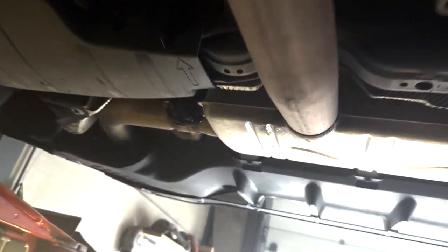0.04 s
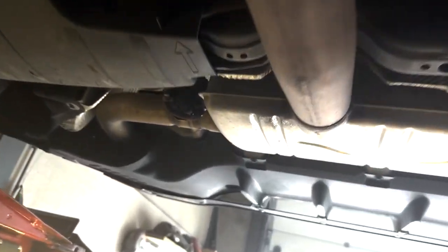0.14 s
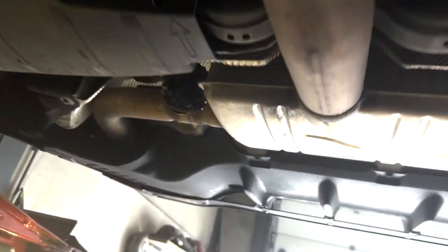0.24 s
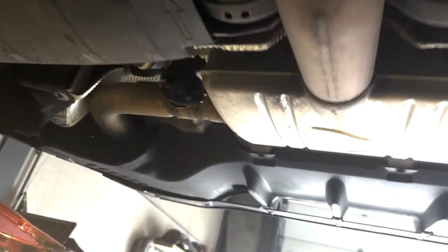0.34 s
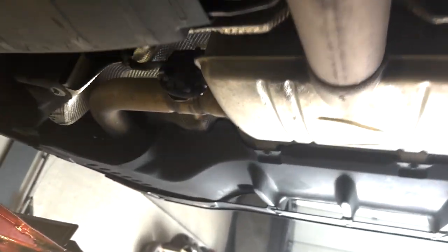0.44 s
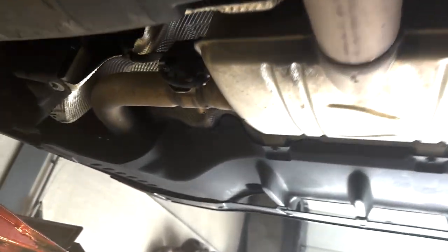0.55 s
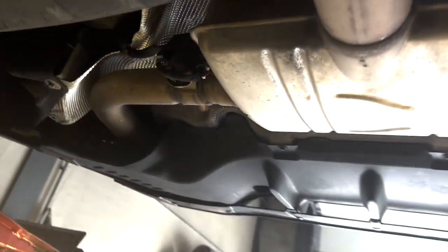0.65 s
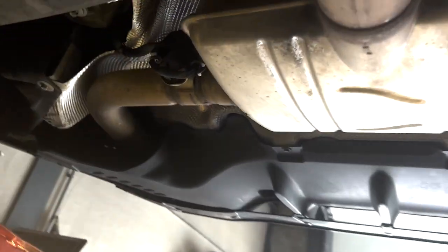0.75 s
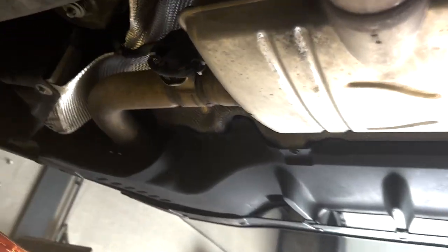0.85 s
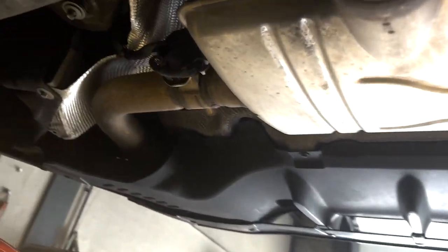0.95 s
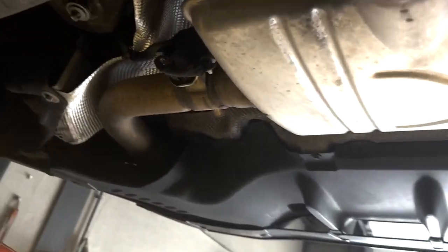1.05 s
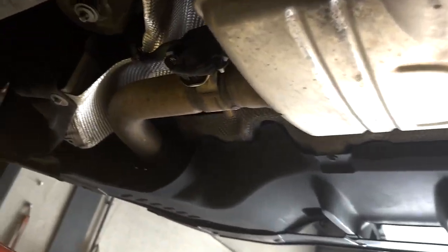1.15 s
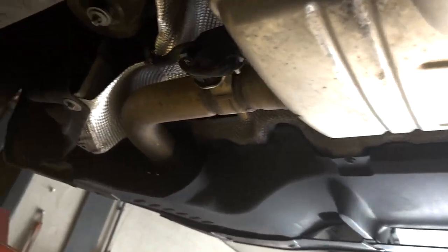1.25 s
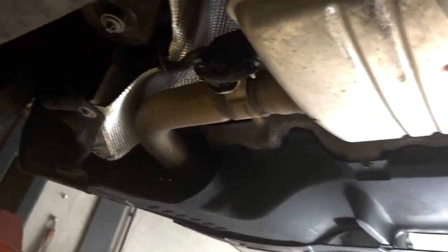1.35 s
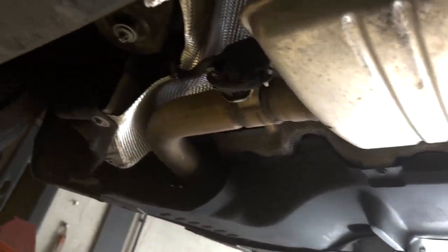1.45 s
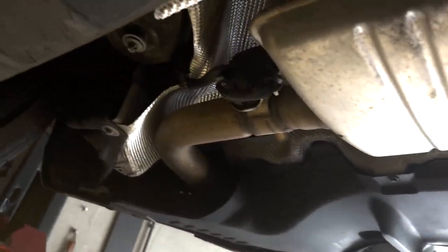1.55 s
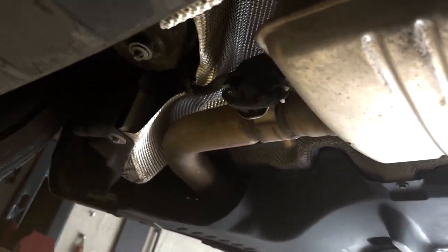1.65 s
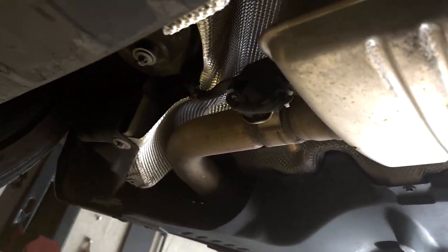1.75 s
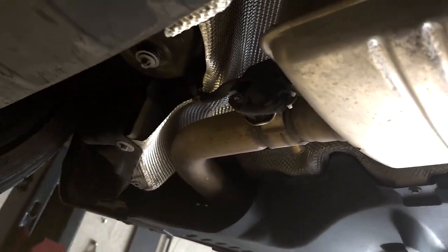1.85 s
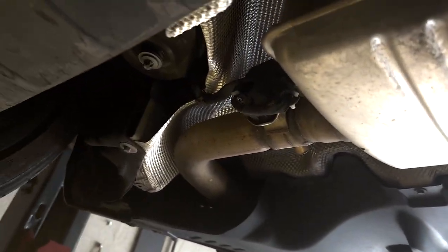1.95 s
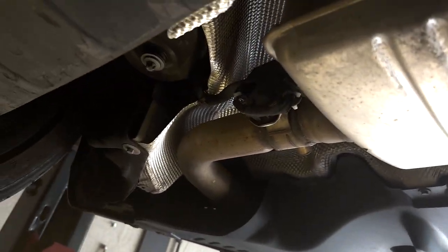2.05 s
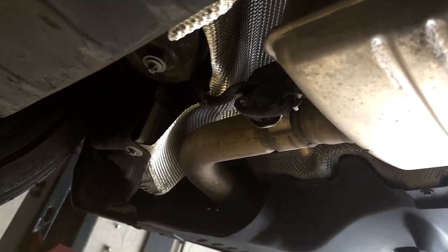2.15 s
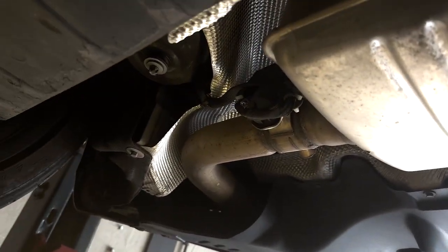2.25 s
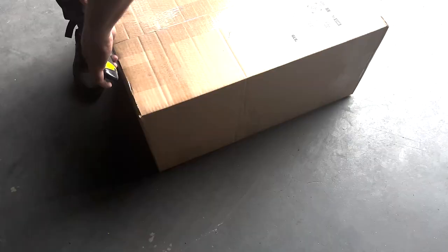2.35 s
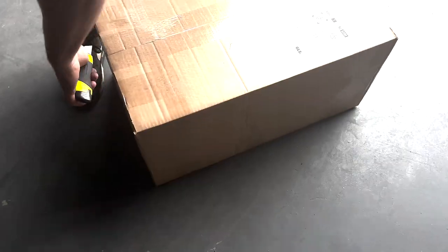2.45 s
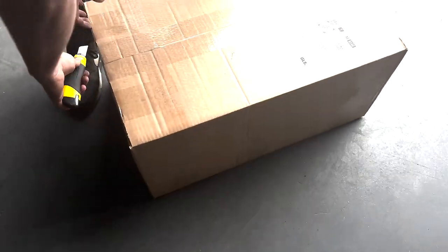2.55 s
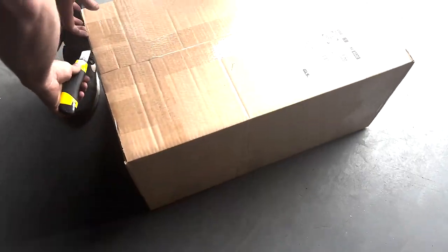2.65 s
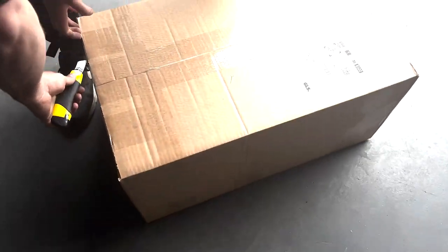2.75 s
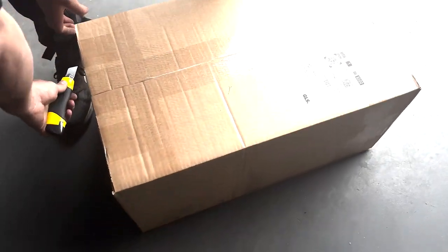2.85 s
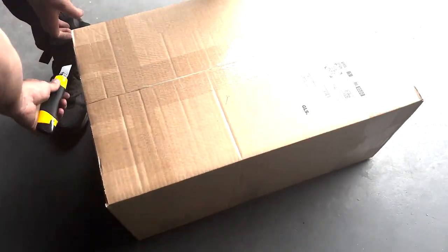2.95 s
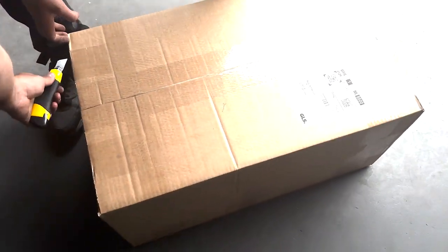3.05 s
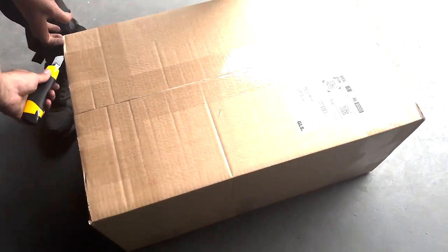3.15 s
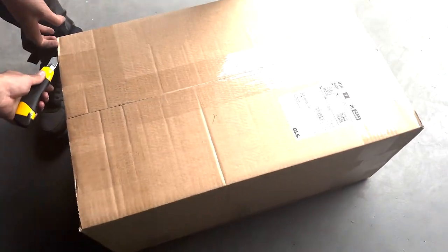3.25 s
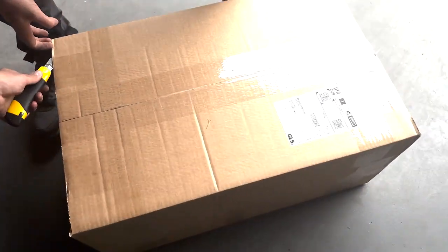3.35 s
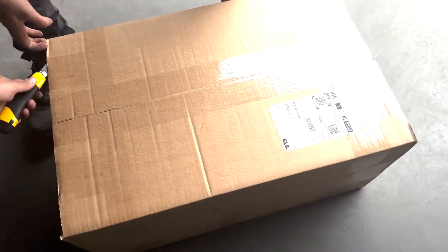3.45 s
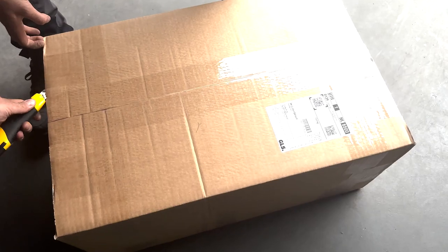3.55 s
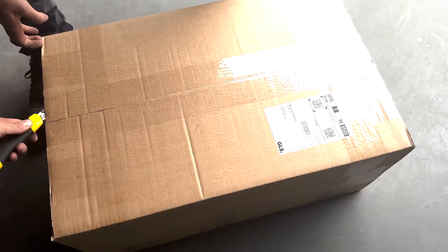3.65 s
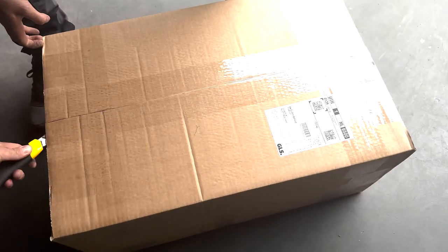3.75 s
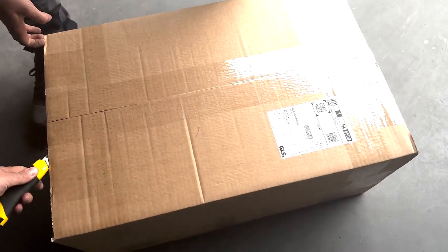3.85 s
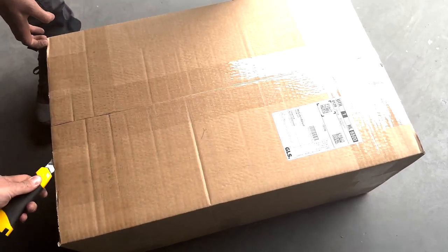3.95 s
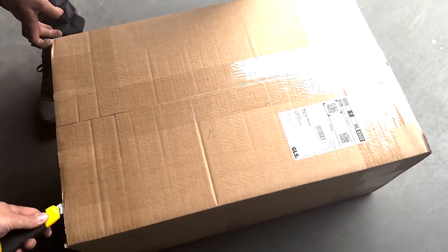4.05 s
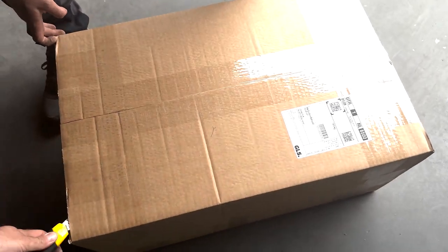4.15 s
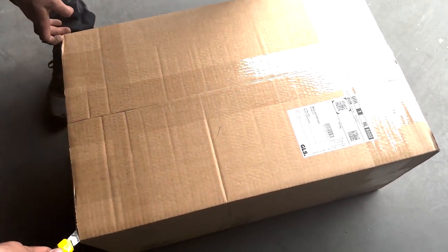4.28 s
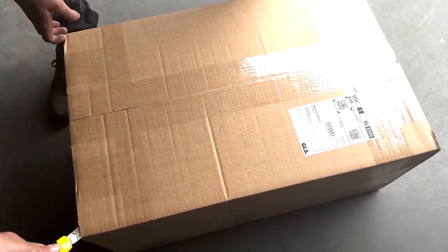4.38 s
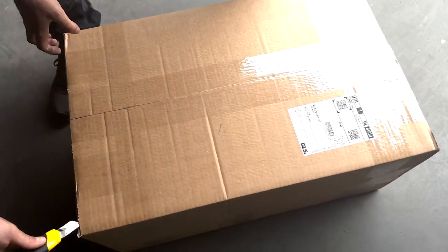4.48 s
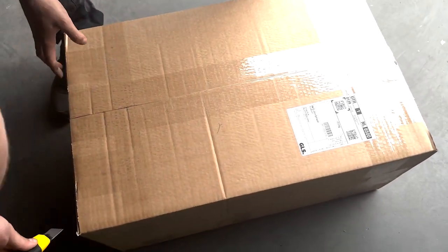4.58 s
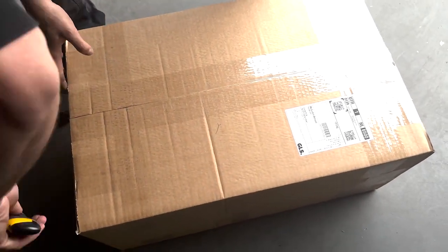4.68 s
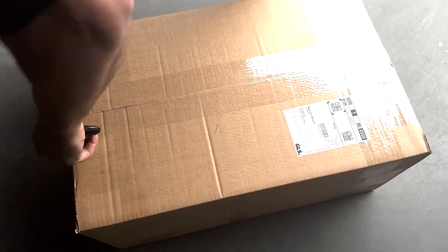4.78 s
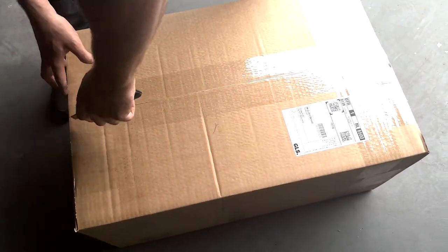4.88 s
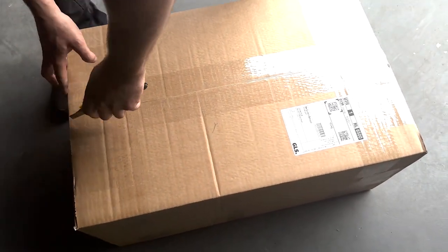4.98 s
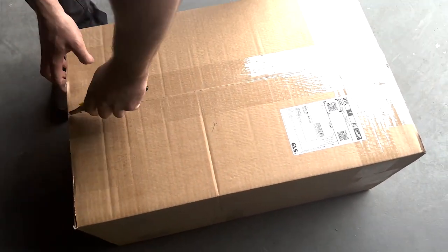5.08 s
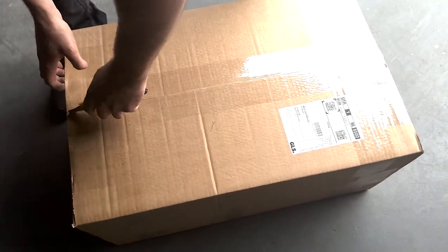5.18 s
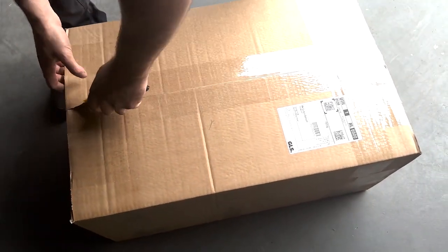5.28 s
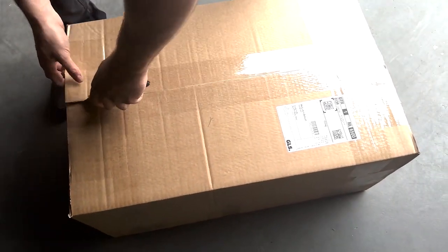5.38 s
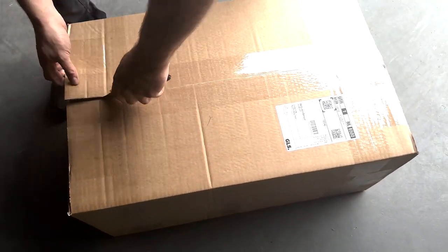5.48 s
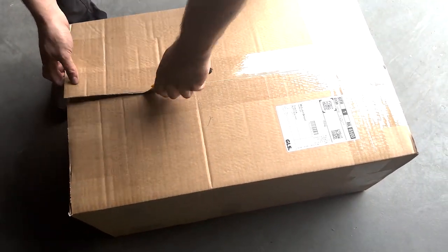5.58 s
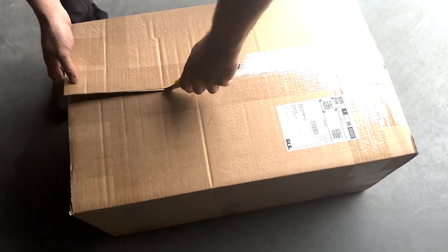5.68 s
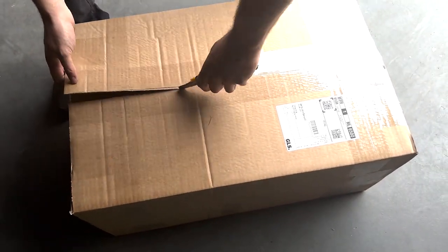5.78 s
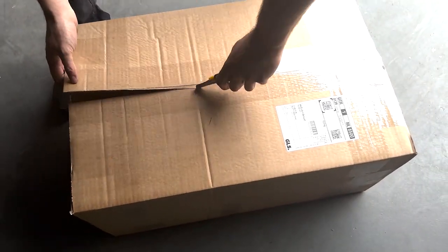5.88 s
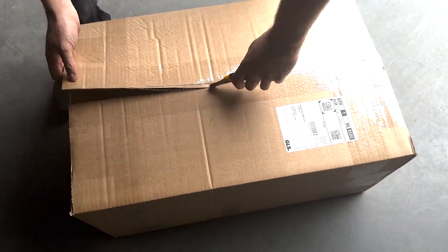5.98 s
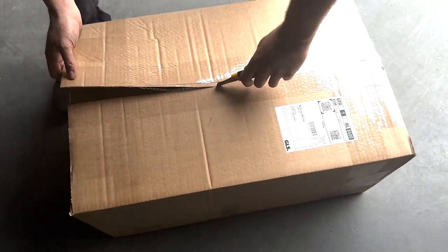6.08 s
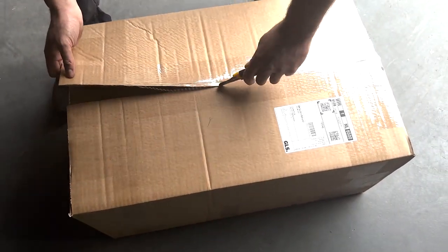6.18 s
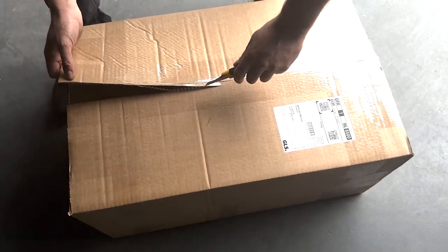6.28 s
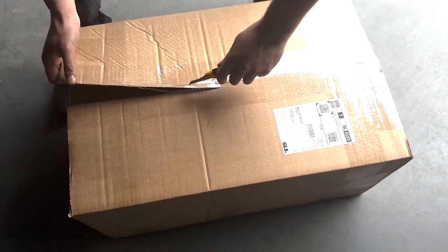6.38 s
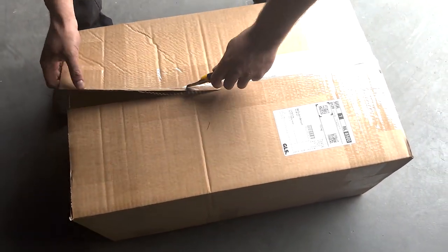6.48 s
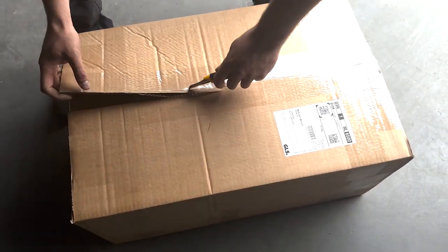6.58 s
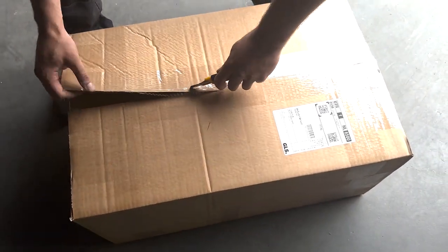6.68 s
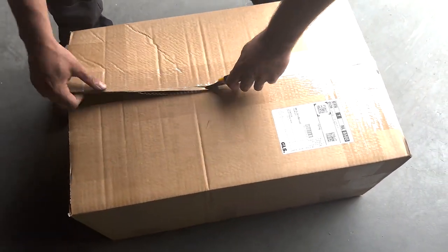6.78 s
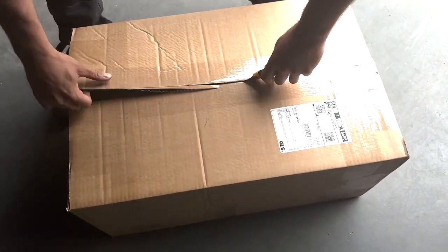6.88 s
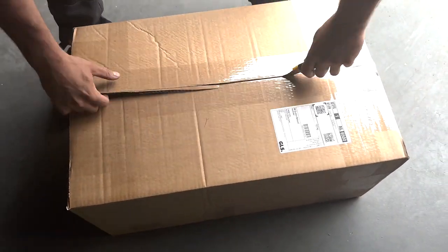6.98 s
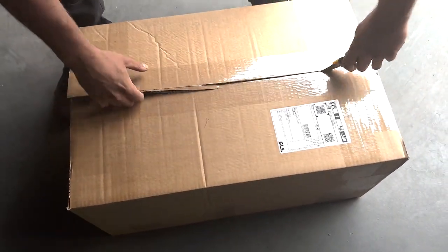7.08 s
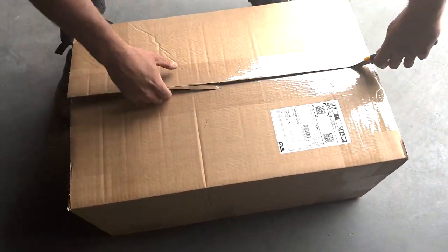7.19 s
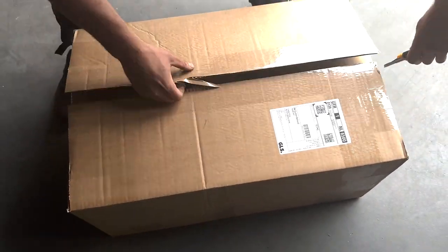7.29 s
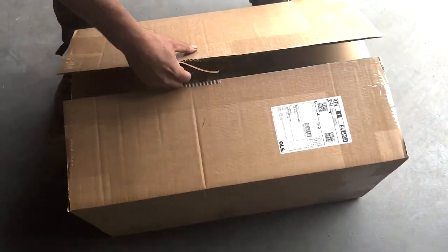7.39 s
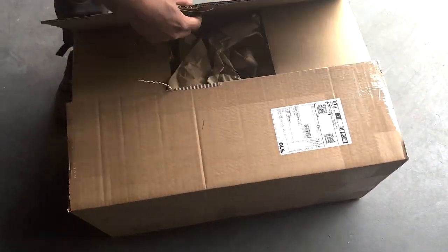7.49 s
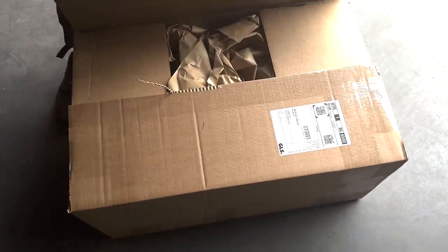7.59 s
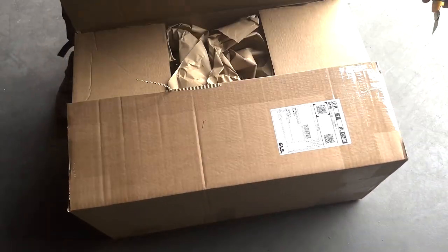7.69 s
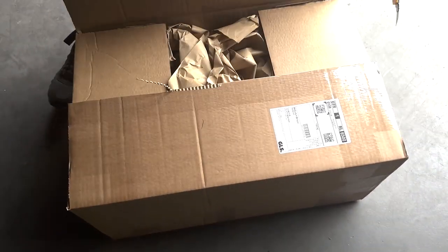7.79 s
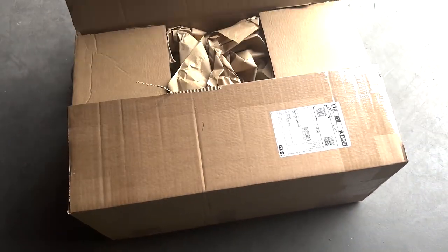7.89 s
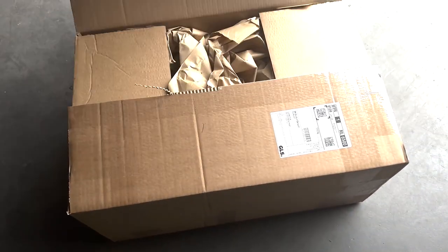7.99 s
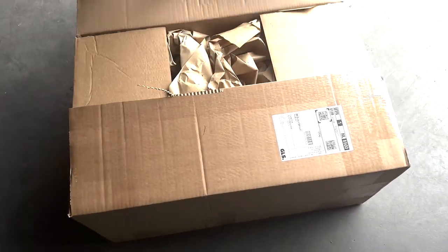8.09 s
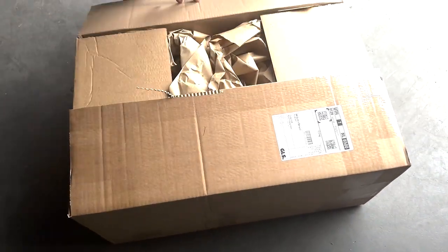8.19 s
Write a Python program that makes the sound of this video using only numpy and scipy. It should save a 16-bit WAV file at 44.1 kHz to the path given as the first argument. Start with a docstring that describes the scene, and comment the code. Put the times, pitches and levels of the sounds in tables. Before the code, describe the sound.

A quiet, reverberant hall opens with faint dull knocks on metal far off at about 0.5 and 0.7 seconds, then a clearer ringing clank at 1.1. At 1.4 a loud, bright metal clatter bursts out in quick blows, its tail fading into a low settling flutter until about 2. A short gush of hiss at 2.2 gives way to steady workshop rumble with a thin high whine. Close up, small cardboard ticks begin near 2.7, growing into sharp snaps and rips from 3.5 to 4.0. A faint steely ring comes at 4.5, then light scrapes. From 5.3 the blade saws through tape and board, crackling densely with hollow booms from 5.6 to 6.2. After softer scraping, a heavy thump at 6.8 starts a hissing, rasping run to 7.4. Soft rustling follows, an air puff at 7.85, and loud flap bangs at 8.1 to 8.2.

```python
"""A quiet, reverberant hall: far knocks on metal ring as noise tails and dying modes, mostly reverberation.
A loud metal clatter follows, made of crashes, ringing partials and hall tails, then a low settling flutter.
A short gush of hiss leads into the steady rumble and thin whine of a workshop.
Close by, a utility knife saws through the tape of a big cardboard box: filtered grains rasp and drum,
noise bursts snap, decaying modes ring and boom; later, panels or loose flaps ring and air puffs out."""
import sys
import numpy as np
from scipy import signal
from scipy.fft import rfft, irfft, next_fast_len
from scipy.io import wavfile
from scipy.ndimage import uniform_filter1d

SR = 44100
rng = np.random.default_rng(int(sys.argv[2]) if len(sys.argv) > 2 else 0)


def generate_wav(sig):
    """Save sig (samples, or channels by samples) to the path in sys.argv[1] as 16-bit PCM at SR."""
    pcm = np.round(np.clip(np.atleast_2d(sig).T, -1, 1) * 32767).astype(np.int16)
    wavfile.write(sys.argv[1], SR, pcm)


N = 362943  # length in samples
TIME = np.arange(N) / SR


def amp(db):
    """Decibels to gain."""
    return 10 ** (np.asarray(db) / 20)


def unit(x):
    """Scales to rms 1."""
    return x / np.sqrt(np.mean(x ** 2) + 1e-20)


def read(points, hz):
    """Reads a spectrum on a log-frequency axis."""
    f, value = np.transpose(sorted(points))
    return np.interp(np.log(hz + 1), np.log(f + 1), value)


def add(mix, s, sound):
    """Mixes a sound in at time s."""
    part = mix[:, max(round(s * SR), 0):][:, :sound.shape[-1]]
    part += sound[..., :part.shape[1]]


def colour(pair, spectrum, side, tilt_db=0, share=0):
    """Causal filter on a mid and side pair, returned as left and right.

    A share of the side is the mid, a quarter turn late.
    """
    size = 4096
    hz = np.fft.rfftfreq(size, 1 / SR)
    log_gain = np.log(amp(read(spectrum, hz) + tilt_db * np.log2((hz + 300) / 2000)))
    # minimum phase: the Hilbert transform of the log gain supplies the phase
    analytic = signal.hilbert(np.r_[log_gain, log_gain[-2:0:-1]])
    taps = np.fft.ifft(np.exp(np.conj(analytic))).real
    taps = taps / np.linalg.norm(taps)
    mid, wide = signal.oaconvolve(pair, taps[None], axes=1)[:, :pair.shape[1]]
    n = next_fast_len(len(wide) + size)
    wide = np.sqrt(1 - share ** 2) * rfft(wide, n)
    if share:
        wide = wide - 1j * share * rfft(mid, n)
    side_gain = amp(read(side, np.fft.rfftfreq(n, 1 / SR)))
    wide = irfft(wide * side_gain, n)[:len(mid)]
    return np.array([mid + wide, mid - wide])


def wander(n, hz):
    """Straight lines between random knots, hz of them a second."""
    knots = rng.standard_normal(int(n / SR * hz) + 2)
    return np.interp(np.arange(n) / SR * hz, np.arange(len(knots)), knots)


def shifting(pair, depth_db, width, length):
    """Drifting hills in the spectrum, like resonances that shift with the contact point on cardboard."""
    z = signal.stft(pair, SR, nperseg=512)[2]
    hills = rng.standard_normal(z.shape[1:])
    for _ in range(2):
        hills = uniform_filter1d(hills, width, axis=0)
        hills = uniform_filter1d(hills, length, axis=1)
    moved = signal.istft(z * amp(depth_db * unit(hills)), SR, nperseg=512)[1]
    return unit(moved[:, :pair.shape[1]])


def grains(n, per_s, spread_db, clump_db, clump_hz):
    """Breaking fibres: clicks of uneven size, in clumps as the blade sticks and slips."""
    size = amp(spread_db * np.minimum(rng.exponential(1, n), 4))
    hits = size * (rng.random(n) < per_s / SR)
    return unit(rng.standard_normal((2, n)) * hits * amp(clump_db * wander(n, clump_hz)))


def ring(modes, pitch, rise, scatter):
    """Sum of dying modes, each detuned at random within the scatter, scaled to peak 1."""
    t = np.arange(SR // 4) / SR
    tone = np.zeros(len(t))
    for hz, db, t60 in modes:
        detune = 1 + scatter * rng.uniform(-0.9, 1)
        tone += amp(db - 60 * t / t60) * np.sin(2 * np.pi * hz * pitch * detune * t)
    tone = tone * (1 - np.exp(-t / rise))
    return tone / abs(tone).max()


# decay of the hall before stretching: (frequency [Hz], T60 [s])
HALL_DECAY = [(80, 0.62), (250, 1.1), (700, 1.03), (2000, 0.9), (5000, 0.86), (9000, 0.69), (15000, 0.5)]


def hall_tail(stretch):
    """Diffuse echoes of the hall: noise in which each band dies at its own rate."""
    hz, t, z = signal.stft(rng.standard_normal((2, SR * 3 // 2)), SR, nperseg=256)
    t60 = stretch * read(HALL_DECAY, hz)[:, None]
    return signal.istft(z * amp(-60 * t / t60), SR, nperseg=256)[1]


# stereo width of everything in the hall: (frequency [Hz], side minus mid [dB])
HALL_WIDTH = [(60, -38.5), (120, -17), (220, -12), (700, 1.5), (1300, 1.5), (3100, -1), (7000, 0.5),
              (15000, -9)]
# spectra of the background layers, each: (frequency [Hz], relative level [dB])
QUIET_HALL = [(15, -50), (25, 5.5), (58, 5), (129, -1), (250, -11), (991, -15), (2080, -23), (8930, -34),
              (11300, -35), (14000, -51)]
SETTLING_METAL = [(25, -17), (40, -12.5), (70, -9), (92, 5.5), (125, -4.5), (190, -8), (260, -10),
                  (330, -2), (430, -16), (800, -17), (2000, -39)]  # low flutter
HISS_GUSH = [(29, -42), (50, -18.5), (102, -1), (181, -11.5), (345, -1), (410, -11.5), (658, -22.5),
             (1700, -23), (3300, -18), (5900, -22.5), (8200, -18), (15000, -38)]
SHOP_RUMBLE = [(25, -29.5), (45, 3), (64, 4.5), (120, -5.5), (220, -4.5), (380, -16.5), (700, -16.5),
               (1300, -21), (2500, -30), (3900, -33.5), (5000, -50), (6000, -46.5), (8000, -35),
               (12000, -56)]
SHOP_WHINE = [(3600, -40), (4100, -12), (4280, 5), (4400, -4.5), (4650, -8), (4900, -40)]


def background():
    """Beds of coloured noise: quiet hall, settling metal, a gush, then the rumble and whine of the shop."""
    def bed(spectrum, level, mottle_db=0):
        """Noise with a level curve of (time [s], level [dB])."""
        noise = rng.standard_normal((2, N))
        if mottle_db:
            noise = shifting(noise, mottle_db, width=2, length=11)
        return colour(noise, spectrum, HALL_WIDTH) * amp(np.interp(TIME, *np.transpose(level)))
    quiet = bed(QUIET_HALL, [(0, -63.5), (.4, -71), (1, -65)])
    settle = bed(SETTLING_METAL, [(1.45, -100), (1.55, -46), (1.67, -40.5), (1.79, -37),
                                  (1.9, -46.5), (2.2, -75), (2.5, -100)])
    gush = bed(HISS_GUSH, [(2.19, -110), (2.2, -43.5), (2.4, -45), (2.6, -73), (2.9, -110)], mottle_db=2.2)
    shop = bed(SHOP_RUMBLE, [(2.39, -110), (2.41, -46.5), (2.8, -47.5), (3.2, -47), (8.2, -47.5)])
    whine = bed(SHOP_WHINE, [(2.39, -110), (2.41, -66.5), (5, -65.5), (6, -64), (8.2, -72)])
    whine = whine * amp(2.5 * wander(N, 6))
    settle = settle * amp(2 * wander(N, 25.07))
    return quiet + settle + gush + (shop + whine) * amp(2.15 * wander(N, 10.0))


# far knocks: (time [s], relative level [dB], treble tilt [dB per octave],
# pitch of the struck part [Hz], relative ringing [dB])
FAR_KNOCKS = [(0.457, -53, -6.5, 750, -16), (0.692, -57.5, -5.5, 3400, -22), (.712, -54, -8.5, 600, -18.5),
              (1.068, -35, -0.5, 1350, -1)]
# tone of the blow: (frequency [Hz], relative level [dB])
KNOCK_TONE = [(35, -20), (60, -14), (91, 1), (132, -8.5), (199, -0.5), (309, -8.5), (355, -2.5), (695, -15),
              (1420, -3), (2310, -8.5), (2980, -1), (3840, -9.5), (5300, -6), (10100, -16.5), (15000, -43)]
# tone of the struck metal humming on: (frequency [Hz], relative level [dB])
KNOCK_HUM = [(100, -42), (950, -17), (1380, -12), (1900, -21), (2400, -9), (3000, -1), (3700, -24),
             (9000, -58)]
# modes of the struck metal: (frequency [Hz], relative level [dB], T60 [s])
STRUCK_METAL = [(350, -10.5, 0.93), (1210, -4, .35), (1420, 1.5, 0.41), (2130, -2, 0.28), (2945, -4, 0.76),
                (3569, -10, .45), (5394, -11, .6), (9895, -12, .33)]


def far_knocks(swell=0.003, ring_db=-16, clank_db=-9, clank_t60=0.9, modes_db=-4):
    """Knocks on metal across the hall: a clank, a hum and modes in a reverberation that takes a moment to build."""
    out = np.zeros((2, N))
    for s, db, tilt_db, hz, sustain_db in FAR_KNOCKS:
        blow = colour(hall_tail(stretch=0.88), KNOCK_TONE, HALL_WIDTH, tilt_db)
        hum = colour(hall_tail(stretch=3.8), KNOCK_HUM, HALL_WIDTH, tilt_db)
        t = np.arange(blow.shape[1]) / SR
        band = [(hz / 2, -45), (hz * 0.65, -7), (hz, 0), (hz * 1.44, -8), (hz * 2, -45)]
        clank = colour(rng.standard_normal(blow.shape), band, HALL_WIDTH)
        clank = clank * amp(clank_db - 60 * t / clank_t60)
        modes = np.zeros(blow.shape)
        for f, level, t60 in STRUCK_METAL:
            phase = rng.random() + .25 * rng.random((2, 1))  # in turns, a little apart in each ear
            modes += amp(level - 60 * t / t60) * np.sin(2 * np.pi * (f * t + phase))
        ringing = amp(sustain_db) * (amp(ring_db) * hum + amp(modes_db) * modes)
        add(out, s, amp(db - 1.5) * (1 - np.exp(-t / swell)) * (blow + clank + ringing))
    return out


# blows of the clatter, the last ones sliding:
# (time [s], relative level [dB], treble tilt [dB per octave], rise [s])
CLATTER_BLOWS = [(1.401, -19.5, -4, 0.003), (1.406, -18, 3, 0.0034), (1.426, -13.5, -1, 0.0011),
                 (1.45, -22, -4, .001), (1.477, -24.5, -5.5, .001), (1.64, -24.5, -5, 0.058),
                 (1.76, -33.5, 7.5, 0.024)]
# tone of the crash: (frequency [Hz], relative level [dB])
CLATTER_TONE = [(29, -25), (50, -23), (81, -12.5), (144, -11), (187, -9.5), (423, -13.5), (501, -8.5),
                (551, -14.5), (607, -9), (1310, -7), (2960, 1.5), (4670, 1.5), (6850, 0), (10800, -5),
                (15500, -18)]
# ringing partials of the metal: (frequency [Hz], relative level [dB])
METAL_PARTIALS = [(2060, -7.0), (2238, -5.0), (2288, -4.5), (2688, -3.5), (2952, -1.5), (3056, -2.1),
                  (3192, -2.7), (3269, -1.9), (3311, -2.1), (3404, -2.0), (3593, 0.0), (3942, -4.2),
                  (4035, -3.6), (4082, -2.4), (4897, -4.3), (5939, -5.8), (6693, -4.0), (6881, -5.7),
                  (6928, -6.0), (7870, -6.2), (8044, -7.2), (8137, -7.6)]


def clatter(blow_t60=0.089, tail_db=-4, partials_db=-6.5, partials_t60=0.57):
    """Metal lands in quick blows: each a bright crash, ringing partials and a long hall tail."""
    out = np.zeros((2, N))
    for s, db, tilt_db, rise in CLATTER_BLOWS:
        tail = amp(tail_db) * hall_tail(stretch=0.91)
        t = np.arange(tail.shape[1]) / SR
        crash = rng.standard_normal(tail.shape) * amp(-10.0 - 60 * t / blow_t60)
        partials = np.zeros(tail.shape)
        for hz, level in METAL_PARTIALS:
            turns = (hz + rng.normal(0, 5.2)) * t + rng.random((2, 1))
            partials += amp(level) * np.sin(2 * np.pi * turns)
        partials = unit(partials) * amp(partials_db - 60 * t / partials_t60)
        swell = 1 - np.exp(-t / rise)  # the first echoes pile up
        blow = colour(crash + tail, CLATTER_TONE, HALL_WIDTH, tilt_db) + partials
        add(out, s, amp(db + 1.0) * swell * blow)
    return out


def room(x, wet_db=-13, floor_db=-17):
    """A bounce off the concrete floor, then the hall's tail."""
    tail = hall_tail(stretch=0.71)
    tail = tail * (1 - np.exp(-np.arange(tail.shape[1]) / SR / 0.002))
    tone = [(60, 3.0), (250, 3), (4000, 3.5), (9000, -2.5), (15000, -5.0)]
    tail = colour(tail, tone, HALL_WIDTH)
    tail = amp(wet_db) * tail / np.linalg.norm(tail[0])
    add(tail, .0055, amp(floor_db) * np.ones(1))
    return x + signal.fftconvolve(x.mean(0)[None], tail, axes=1)[:, :N]


# stereo width of close sounds: (frequency [Hz], side minus mid [dB])
NEAR_WIDTH = [(60, -50), (200, -28), (380, -8), (700, 0.5), (1300, -22.5), (2400, 0.5), (8000, -9),
              (11000, 10.5), (15000, 12.5)]
PORT_SHARE = 0.78  # share of a close sound's side that is the mid, a quarter turn late


def near(pair, spectrum, tilt_db=0):
    """Colours a sound made close to the microphone."""
    return colour(pair, spectrum, NEAR_WIDTH, tilt_db, PORT_SHARE)


LID_S = 4.7  # when the knife moves from the end of the box to the lid


def wall(drive, end, lid):
    """Response of the part of the box that the knife is working on: first its end, then its lid."""
    move = round(LID_S * SR)
    return np.hstack([near(drive[:, :move], end), near(drive[:, move:], lid)])


BEND_DELAY_S = 0.001202  # travel time of a bending wave at 1 kHz, before a common time shift


def disperse(pair):
    """A crack travels through the board as a bending wave: the treble arrives first, so it chirps downward."""
    n = pair.shape[1]
    hz = np.fft.rfftfreq(n, 1 / SR)
    phase = 4 * np.pi * BEND_DELAY_S * (np.sqrt(1000 * hz) - hz / 5)
    return irfft(rfft(pair) * np.exp(-1j * phase), n)


# air pushed out by a flap: (time [s], relative level [dB])
AIR_PUFFS = [(6.825, -46), (7.845, -21)]


def puffs():
    """Slow pulses of air from under the flaps: pressure swings up, then back below rest."""
    out, t = np.zeros((2, N)), np.arange(SR // 8) / SR
    for s, db in AIR_PUFFS:
        u = t / 0.0029
        add(out, s, amp(db + 7.5) * u * (2 - u) * np.exp(-u))
    return out


# the box walls give or are bumped: (time [s], peak level [dB], pitch factor)
BOX_THUMPS = [(3.505, -29, 1.4), (3.552, -28.5, 1.1), (3.651, -25, 1.33), (3.776, -20.5, 1.5),
              (4.023, -24.5, 1), (4.075, -26.5, 1.26), (4.325, -31, 1.4), (5.086, -33.5, 0.93),
              (5.172, -25, 1), (5.257, -26.5, 0.73), (5.347, -11, 1.12), (5.624, -23, 1.1),
              (5.788, -15.5, 0.83), (5.849, -22.5, 0.84), (5.895, -24, 1.03), (5.939, -21.5, 0.89),
              (5.985, -16, 0.83), (6.055, -23, 1.13), (6.224, -20.5, 0.98), (6.454, -30, 0.86),
              (6.82, -2.5, 0.94), (6.886, -14, 1.08), (6.904, -16.5, 1.12), (6.947, -14, .95),
              (6.978, -17, 1.25), (7.018, -17.5, 1.08), (7.279, -16.5, 0.98), (7.316, -19.5, 0.52),
              (7.401, -19, 1.1), (7.826, -23, 1.46), (8.039, -19.5, 1.26), (8.112, -16, 1.08),
              (8.162, -7, 1.12), (8.191, -4.5, 1.14)]
# air and wall modes of the box: (nominal frequency [Hz], relative level [dB], T60 [s])
BOX_MODES = [(132.7, -28, 0.77), (163, 4, 0.075), (201, 1.5, 0.056), (327, -16, 0.12), (625, -15.5, 0.057)]


def thumps():
    """Hollow booms: the box modes ring as a wall gives or is bumped."""
    out = np.zeros((2, N))
    for s, db, pitch in BOX_THUMPS:
        add(out, s, -amp(db) * ring(BOX_MODES, pitch, rise=0.0041, scatter=0.037))
    return out


# a panel or loose flap is struck or springs: (time [s], peak level [dB])
PANEL_OR_FLAP_HITS = [(5.344, -27), (7.405, -20.5), (8.146, -12), (8.186, -18.5)]
# modes of that panel or flap: (nominal frequency [Hz], relative level [dB], T60 [s])
PANEL_OR_FLAP_MODES = [(614, 4, 0.062), (645, -20, 0.21), (1270, -4, 0.037)]


def panel_or_flap():
    """A panel or loose flap, struck or sprung, rings."""
    out = np.zeros((2, N))
    for s, db in PANEL_OR_FLAP_HITS:
        add(out, s, amp(db) * ring(PANEL_OR_FLAP_MODES, 0.99, rise=0.0019, scatter=0.005))
    return out


# the steel blade springs free: (time [s], frequency [Hz], peak level [dB], T60 [s])
BLADE_RING = (4.539, 7880, -37, .15)


def blade():
    """One short, high ring of thin steel."""
    s, hz, db, t60 = BLADE_RING
    out = np.zeros((2, N))
    add(out, s, amp(db) * ring([(hz, 0, t60)], 1.0, rise=0.00037, scatter=0))
    return out


# friction makes a flap (low) or the taut tape (high) squeak hoarsely:
# (time [s], length [s], start [Hz], end [Hz], width [Hz], relative level [dB])
SQUEAKS = [(3.494, 0.03, 2600, 2380, 600, -38.5), (3.536, 0.024, 2500, 2190, 700, -37.5),
           (3.707, .016, 2420, 1910, 800, -34), (3.704, .01, 6400, 7400, 1300, -31),
           (3.786, 0.029, 6400, 6100, 450, -40), (4, 0.021, 2400, 2170, 500, -43),
           (5.39, 0.16, 6120, 6630, 2400, -45.5), (5.539, 0.093, 6300, 6900, 1800, -29),
           (5.803, 0.17, 7100, 6800, 1200, -44), (6.759, 0.018, 6700, 6770, 1800, -34),
           (6.762, 0.026, 720, 650, 150, -30), (7.016, 0.047, 1750, 1240, 900, -38),
           (7.01, 0.24, 7300, 6700, 2600, -37), (7.13, .13, 1900, 1700, 1500, -39),
           (7.244, .04, 8800, 8400, 900, -42), (7.372, 0.036, 1220, 1210, 130, -37),
           (7.994, 0.035, 2940, 2940, 320, -42.5), (8.029, 0.042, 1264, 1257, 140, -36.5),
           (8.08, 0.046, 1280, 1260, 140, -40)]


def rubs():
    """Friction excites one resonance for a moment; it glides as the contact point moves."""
    out = np.zeros((2, N))
    for s, length, start_hz, end_hz, width_hz, db in SQUEAKS:
        n = int(length * SR)
        keep = np.exp(-np.pi * width_hz / SR)
        noise = rng.standard_normal((2, 2 * n)) + 1j * rng.standard_normal((2, 2 * n))
        flutter = signal.lfilter([1], np.poly([keep, keep, keep]), noise)[:, n:]
        turns = np.cumsum(np.linspace(start_hz, end_hz, n)) / SR
        squeak = (flutter * np.exp(2j * np.pi * turns)).real
        add(out, s, amp(db) * unit(squeak) * signal.windows.tukey(n, .6))
    return near(out, [(100, 0), (16000, 0)])


# short rips through the corrugation:
# (time [s], length [s], relative board level [dB], relative fibre crackle [dB])
CORRUGATION_RIPS = [(2.679, 0.012, -41, -39), (3.356, 0.016, -39, -39), (3.494, 0.027, -28.5, -30.5),
                    (3.528, 0.022, -30.5, -30), (3.611, 0.0095, -27, -25), (3.624, 0.029, -24, -24.5),
                    (3.7043, 0.0069, -22.5, -21.5), (3.714, 0.012, -31, -35), (3.768, 0.023, -26, -27),
                    (3.991, 0.009, -26, -26.5), (4.01, 0.017, -26, -33), (4.046, 0.019, -27.5, -24.5),
                    (4.065, 0.013, -31.5, -26), (4.309, 0.017, -36.5, -35.5), (4.533, 0.022, -51, -40),
                    (5.215, 0.021, -38.5, -41.5), (5.541, 0.09, -34, -27.5), (5.746, 0.012, -31, -27),
                    (5.957, 0.009, -24, -26), (6.051, 0.006, -18, -25), (6.134, 0.006, -22, -23),
                    (6.449, 0.015, -33.5, -44), (6.542, 0.02, -34, -45), (6.662, 0.014, -32.5, -41.5),
                    (6.763, 0.016, -26.5, -30), (6.795, 0.025, -21.5, -25.5), (7.248, 0.024, -38, -29.5),
                    (7.299, .014, -29.5, -29), (7.395, 0.011, -26, -24), (7.817, 0.009, -25, -33),
                    (7.83, 0.012, -32, -42), (8.037, 0.01, -31.5, -41), (8.12, 0.052, -28, -20.5)]
# tone of cracking and scraping, on the stiff end wall and on the lid, and of the hollow box behind
# each: (frequency [Hz], relative level [dB])
END_CRACK_TONE = [(300, -33), (1200, 3.5), (1850, 3.5), (2300, 2), (2800, 8.5), (3250, -0.5), (4200, 8.5),
                  (4900, 2.5), (5800, 6), (7500, 3), (9000, 2), (12500, -18), (16000, -14)]
LID_CRACK_TONE = [(300, -15), (1200, -4.5), (2600, 3), (3600, 2.5), (4700, -2), (6500, 9), (9000, 2),
                  (12500, -11.5), (16000, -10)]
END_BOARD_TONE = [(250, -16.5), (400, 6), (500, 4), (670, 9), (950, 3.5), (1180, 4.5), (1550, -2.5),
                  (1850, 0), (2300, -2.5), (2800, 4.5), (3250, -11.5), (4200, -2), (5500, -18.5),
                  (9000, -36)]
LID_BOARD_TONE = [(250, -34.5), (420, 3), (600, 8), (760, 7), (960, 3.5), (1220, 5), (1480, 1), (1850, 0),
                  (2400, -0.5), (3000, -1), (4000, -8), (5500, -7.5), (9000, -56.5)]
END_HOLLOW_TONE = [(25, -33), (60, 9.5), (100, 2.5), (160, 0.5), (220, 2), (300, 1.5), (420, -12.5),
                   (650, -15), (1200, -51)]  # the stiff end answers broadly
LID_HOLLOW_TONE = [(25, -35), (60, -11.5), (95, 2.5), (150, 2.5), (205, 0.5), (260, -4.5), (400, -17),
                   (600, -21), (1200, -55)]  # the loose lid booms
RIP_SWELL_DB = 5.5  # strain builds through a rip until the flute gives way


def rips(hollow_db=-3, board_db=0.0):
    """Quick runs of breaking fibres as the blade saws through a flute or a flap tears free."""
    force = np.zeros((2, N))  # on the fibres, on the board
    for s, length, db, fibre_db in CORRUGATION_RIPS:
        n = int(length * SR)
        swell = amp(RIP_SWELL_DB * np.linspace(-.5, .5, n))
        add(force, s, amp([[fibre_db], [db]]) * signal.windows.tukey(n, .3) * swell)
    fibres = grains(N, per_s=6000, spread_db=1.0, clump_db=2, clump_hz=450)
    crackle = shifting(wall(fibres, END_CRACK_TONE, LID_CRACK_TONE), depth_db=2.5, width=7, length=4)
    board = shifting(wall(fibres, END_BOARD_TONE, LID_BOARD_TONE), depth_db=2, width=3, length=6)
    hollow = wall(force[1] * fibres, END_HOLLOW_TONE, LID_HOLLOW_TONE)
    keep = np.exp(-1 / (SR * 0.006))  # the board rings on for a few milliseconds
    shake = signal.lfilter([1 - keep], [1, -keep], force[1])
    return force[0] * crackle + amp(board_db) * shake * board + amp(hollow_db) * hollow


# sharp snaps of tape (high) and board fibres (low):
# (time [s], peak level of the crack [dB], nominal pitch of the broken piece [Hz], treble tilt [dB per octave])
TAPE_AND_FIBRE_SNAPS = [(2.681, -24.5, 1900, -5), (2.875, -31, 2640, -2), (3.055, -34, 4700, 5),
                        (3.16, -22.5, 3120, -1.5), (3.237, -29.5, 9100, 11), (3.329, -21, 9000, 6.5),
                        (3.359, -19.5, 2430, -3), (3.516, -13, 6160, 10), (3.552, -13.5, 2810, -4),
                        (3.589, -28, 6000, 7), (3.647, -13, 1510, -3), (3.7082, -11, 6860, 5),
                        (3.7141, -8.5, 2340, -1.5), (3.735, -16, 3000, 0), (3.7447, -5.5, 2700, 0),
                        (3.7714, -5.5, 8000, -0.5), (3.785, -18.5, 1190, -1), (4.0043, -2, 2500, 3),
                        (4.2045, -39, 2310, -2), (4.534, -22, 2090, -2.5), (4.5514, -28, 4400, -1),
                        (4.61, -29, 4430, -2.5), (4.793, -31, 2620, -7.5), (4.822, -28, 2750, -8),
                        (4.994, -31.5, 2540, -6), (5.082, -25.5, 2480, -6), (5.135, -20, 2910, -4),
                        (5.162, -17, 2490, -2), (5.272, -35, 5000, 0), (5.4, -27, 6000, -4),
                        (5.4843, -27, 6100, -8), (5.498, -26, 2730, -7), (5.305, -15, 2900, -1),
                        (5.341, -8.5, 720, -6.5), (5.6262, -3.5, 6300, -1.5), (5.669, -6, 5900, -1.5),
                        (5.683, -8.5, 5700, -1), (5.7229, -14, 7360, -5), (5.751, -8, 6830, -5),
                        (5.782, -5.5, 3120, 0.5), (5.832, -22, 2820, -3), (5.8476, -23, 5560, -4),
                        (5.867, -21, 6000, -3), (5.876, -18, 2900, -7), (5.892, -16.5, 1290, -7),
                        (5.924, -15.5, 3000, -6.5), (5.9465, -6, 5870, -5), (5.96, -3.5, 2540, -1),
                        (5.994, -6, 5550, -2.5), (6.05, -5, 1880, -5), (6.094, -8.5, 2100, -2.5),
                        (6.134, -7, 5940, -7), (6.2006, -19.5, 3020, -8.5), (6.224, -16, 3600, -1),
                        (6.378, -21.5, 2550, -8), (6.552, -15, 3820, -1), (6.772, -12.5, 7000, -7.5),
                        (6.817, -5, 6200, -6.5), (6.853, -25, 2400, -8), (6.869, -23, 6000, -3),
                        (6.885, -28, 1700, -4), (6.898, -30, 1700, -4), (6.932, -22, 5800, -8),
                        (6.946, -16.5, 3240, -2.5), (6.9546, -19, 2800, -8), (6.971, -12, 3180, -6),
                        (6.98, -17, 2720, -5), (7.2874, -30, 6130, 8), (7.309, -11, 2700, -4),
                        (7.4, -8, 6200, 14), (7.969, -27, 3000, -12), (8.1064, -5, 6700, -6),
                        (8.156, -4.5, 3900, 1), (8.183, -1.5, 8500, 1)]
# modes of the end wall and of the lid, each: (nominal frequency [Hz], relative level [dB], T60 [s])
END_MODES = [(630, -4, 0.031), (680, 6, 0.029), (1160, 2, 0.038), (2260, 0, 0.024), (2820, 1.5, .03)]
LID_MODES = [(488, 1, 0.052), (602, -3, 0.047), (630, -3.5, 0.043), (775, 7, 0.021), (1186, 9.5, 0.027),
             (1243, -23, 0.011), (1816, 6, 0.014)]
FULL_SNAP_DB = -5  # reference snap, with no tilt, for the settings below
CRACK_T60_S, CRACK_TAIL_DB, CRACK_TAIL_T60_S = 0.0056, -24.5, 0.18  # the crack, and its faint after-rustle
# weak and dull snaps give way slowly: the crack lasts twice as long for every so many
CRACK_DOUBLING_DB, CRACK_DULL_DOUBLING = 24, 14  # dB less; dB per octave of dullness
PANEL_RING_DB, BOX_RING_DB, RING_GROWTH = -15.5, -27.5, 1.62  # ringing, and its dB per dB of snap
DULL_RING_DB = 1.09  # extra ringing per dB per octave of dullness: a slow break pushes the board further
END_WALL_RING_DB = -3.5  # the stiff end of the box rings less than the lid


def snaps(panel_delay=0.001415, piece_db=5.0, strain_db=-19, piece_ring_db=-19, piece_t60=0.019):
    """Tape or fibres strain, then crack; the broken piece rings, and the bending wave sets off panel and box."""
    lead = .012  # seconds of strain before the crack
    out, t = np.zeros((2, N)), np.arange(-lead, .1, 1 / SR)
    after, hz = np.maximum(t, 0), np.geomspace(200, 17000, 80)
    rustle = amp(CRACK_TAIL_DB - 60 * after / CRACK_TAIL_T60_S)
    strain = amp(strain_db + 2700 * t)
    for s, db, piece_hz, tilt_db in TAPE_AND_FIBRE_SNAPS:
        tone, panel, ring_db = LID_CRACK_TONE, LID_MODES, 0
        if s < LID_S:
            tone, panel, ring_db = END_CRACK_TONE, END_MODES, END_WALL_RING_DB
        doublings = (FULL_SNAP_DB - db) / CRACK_DOUBLING_DB - tilt_db / CRACK_DULL_DOUBLING
        t60 = CRACK_T60_S * 2 ** doublings
        force = np.where(t < 0, strain, amp(-60 * after / t60) + rustle)
        spectrum = read(tone, hz) + piece_db * np.exp(-(np.log2(hz / piece_hz) * 2) ** 2)
        burst = rng.standard_normal((2, len(t))) * force
        crack = disperse(near(burst, list(zip(hz, spectrum)), tilt_db))
        piece = ring([(piece_hz, 0, piece_t60)], 0.97, rise=0.00047, scatter=0.018)
        panel_ring = ring(panel, rng.uniform(0.98, 1.04), rise=0.00014, scatter=0.044)
        box_ring = ring(BOX_MODES, rng.uniform(0.837, 1.1), rise=0.0076, scatter=0.055)
        push_db = RING_GROWTH * (db - FULL_SNAP_DB) - DULL_RING_DB * tilt_db + ring_db
        add(out, s + 0.001039 - lead, amp(db) * crack / abs(crack).max())
        add(out, s + panel_delay, amp(db + piece_ring_db) * piece)
        add(out, s + panel_delay, amp(push_db + PANEL_RING_DB) * panel_ring)
        add(out, s + panel_delay, amp(push_db + BOX_RING_DB) * box_ring)
    return out


def coarse_fibres(low_hz=1000, high_hz=6500, count=12):
    """Single thick fibres part, each with a short ring at one of a dozen pitches."""
    out, t = np.zeros((2, N)), np.arange(SR // 50) / SR
    for hz in np.geomspace(low_hz, high_hz, count):
        breaks = rng.uniform(-1, 1, (2, N)) * (rng.random(N) < 14 / SR)  # 14 a second on average
        tick = unit(np.sin(2 * np.pi * hz * t) * np.exp(-hz * t / 2.5))
        out += signal.oaconvolve(breaks, tick[None], axes=1)[:, :N]
    return unit(near(out, [(200, -18), (600, 2), (8000, 0), (13000, -10)]))


FLUTES_PER_S = 125  # typical rate at which the dragged blade crosses flutes of the corrugation


def stick_slip(jitter=0.3, bite_db=3.5):
    """The blade catches on each flute, lets go with a jerk and slows again; the grip varies by flute."""
    turns = np.cumsum(FLUTES_PER_S * np.exp(jitter * wander(N, 40))) / SR
    grip = np.minimum(rng.exponential(1, 4000), 2.5)[turns.astype(int) % 4000]
    return unit(amp(bite_db * grip * np.exp(-4 * (turns % 1))))


# strokes of blade and hands over the box: (start of hold [s], hold [s], force [dB],
# hiss of tape over scrape of board [dB], give of the wall there [dB])
KNIFE_STROKES = [(2.424, 0.052, -48, -6, -10), (2.707, 0.13, -54, -3, 6.5), (3.343, 0.17, -46.5, -10, -24),
                 (3.525, 0.32, -46, 0, 7), (3.922, 0.39, -43.5, -2, -0.5), (4.495, 0.028, -46.5, -1.5, -7),
                 (4.646, 0.21, -54, -16, 1), (5.235, 0.58, -43.5, -10.5, 2), (5.602, 0.033, -33, -2.5, -5),
                 (5.743, 0.23, -38.5, 1.5, 2), (6.069, 0.11, -44, -1.5, 8), (6.484, 0.48, -43.5, -8, -2.5),
                 (6.815, 0.24, -33, -7.5, -4), (7.043, 0.13, -38.5, -3.5, -2), (7.161, 0.14, -34, -2.5, -9),
                 (7.372, 0.052, -42, -3, 7), (7.54, 0.17, -51, -2.5, 0), (7.85, 0.02, -49, -0.5, 2),
                 (7.963, 0.062, -46, -2.5, 6.5), (8.037, 0.033, -37, -6.5, 0), (8.14, 0.033, -32, -7, 3.5)]
# tone of the tape hiss: (frequency [Hz], relative level [dB])
TAPE_TONE = [(2000, -25.5), (3000, -5), (3800, -2.5), (4800, -9), (5600, 0.5), (6650, 0), (7700, -1),
             (8500, -6), (10300, -6), (12300, -32.5), (15300, -14.5)]
STROKE_RISE_DB_PER_S, STROKE_FALL_DB_PER_S = 110, 117  # every stroke swells and dies away alike
# drumming of the box at a reference force, before the give of the wall, and its dB per dB of force
DRUM_DB, DRUM_AT_DB, DRUM_GROWTH = -37, -41.5, 1.6


def cutting(hiss_db=5.5, board_db=-2.0, ticks_db=-9.0):
    """The dragged blade makes tape hiss, board scrape and the hollow box drum, the more so the harder it is pushed."""
    hiss, scrape, drum = np.zeros((3, N))
    for s, hold, force_db, tape_db, give_db in KNIFE_STROKES:
        rise_db = STROKE_RISE_DB_PER_S * np.maximum(s - TIME, 0)
        fall_db = STROKE_FALL_DB_PER_S * np.maximum(TIME - s - hold, 0)
        force = amp(force_db - np.minimum(rise_db + fall_db, 90))
        scrape = np.maximum(scrape, force)
        hiss = np.maximum(hiss, force * amp(tape_db))
        drum = np.maximum(drum, amp(DRUM_DB + give_db) * (force / amp(DRUM_AT_DB)) ** DRUM_GROWTH)
    tape = near(grains(N, per_s=9000, spread_db=-0.5, clump_db=-2.0, clump_hz=443), TAPE_TONE)
    tape = shifting(tape, depth_db=2, width=7, length=8)
    breaks = disperse(grains(N, per_s=1600, spread_db=1.5, clump_db=2.5, clump_hz=300))
    board = shifting(wall(breaks, END_BOARD_TONE, LID_BOARD_TONE), depth_db=3, width=3, length=7)
    bumps = grains(N, per_s=900, spread_db=0.5, clump_db=2, clump_hz=31.2)
    hollow = wall(bumps, END_HOLLOW_TONE, LID_HOLLOW_TONE)
    slips = stick_slip()
    rasp = slips * scrape * (amp(board_db) * board + amp(ticks_db) * coarse_fibres())
    return np.sqrt(slips) * amp(hiss_db) * hiss * tape + rasp + drum * hollow


def scene():
    """The hall, and the box close to the microphone."""
    hall = background() + far_knocks() + clatter()
    box = puffs() + thumps() + panel_or_flap() + blade() + rubs() + rips() + snaps() + cutting()
    return hall + room(box)


EDGE_HZ = 16000  # upper band limit


def record(dry):
    """Low cut of the microphone, full-scale limit, then the band limit."""
    dry = signal.sosfilt(signal.butter(2, 32, "high", fs=SR, output="sos"), dry)
    low_pass = signal.firwin(511, EDGE_HZ, window=("kaiser", 9), fs=SR)
    return signal.oaconvolve(np.clip(dry, -1, 1), low_pass[None], "same")


dry = scene()
out = record(dry)
generate_wav(out)
```